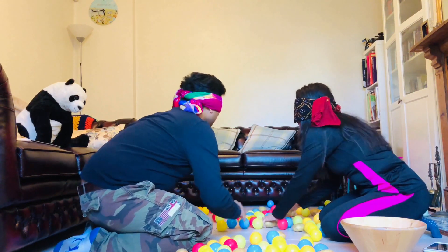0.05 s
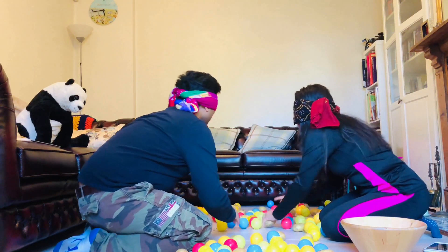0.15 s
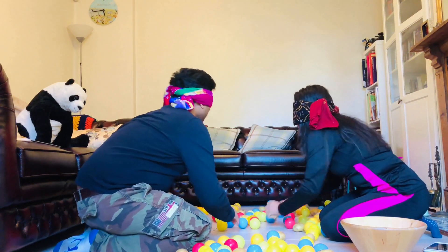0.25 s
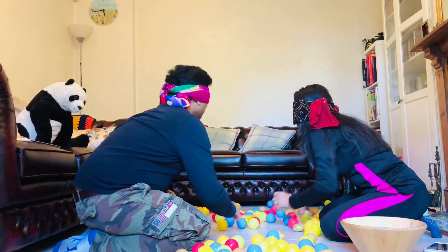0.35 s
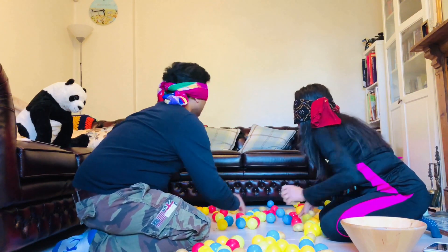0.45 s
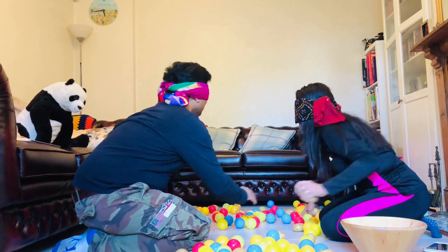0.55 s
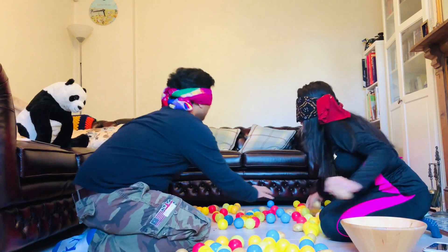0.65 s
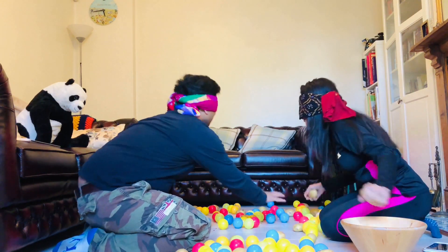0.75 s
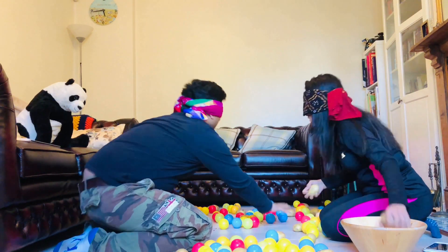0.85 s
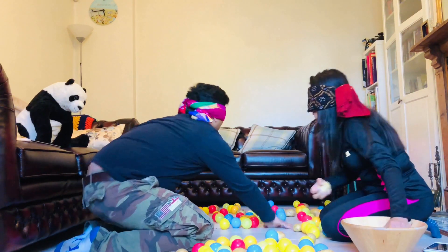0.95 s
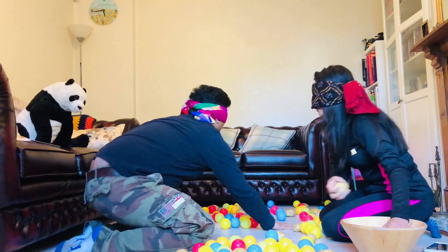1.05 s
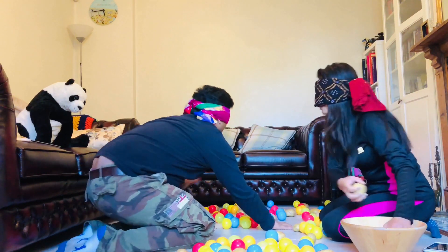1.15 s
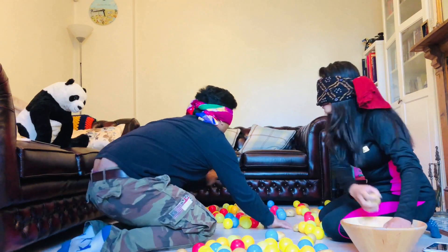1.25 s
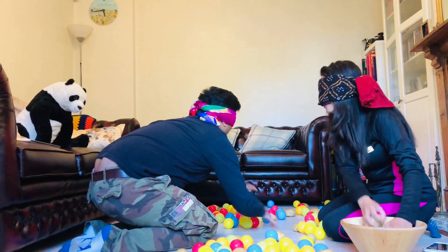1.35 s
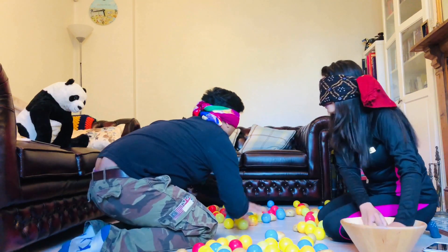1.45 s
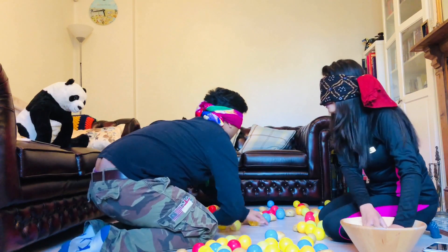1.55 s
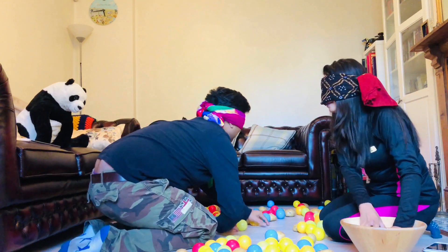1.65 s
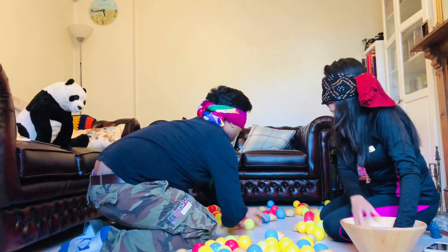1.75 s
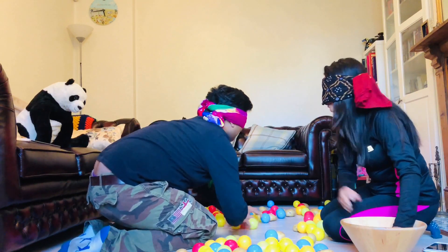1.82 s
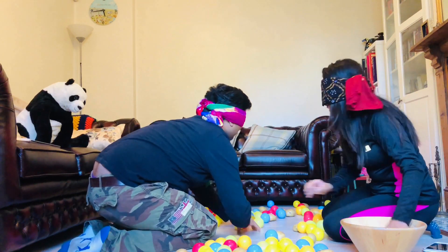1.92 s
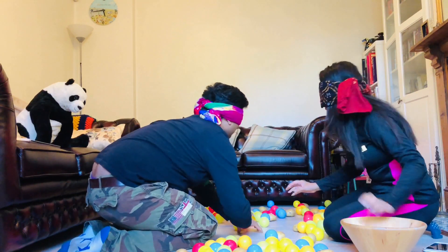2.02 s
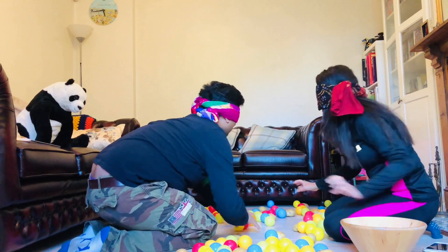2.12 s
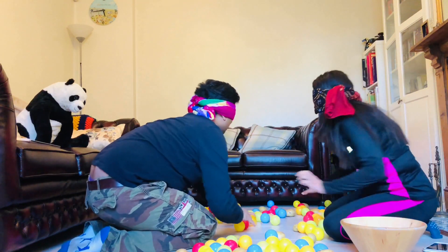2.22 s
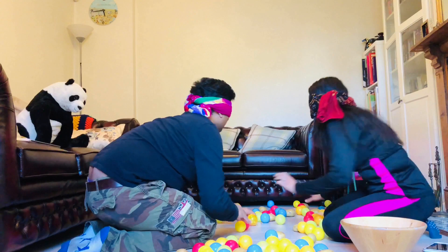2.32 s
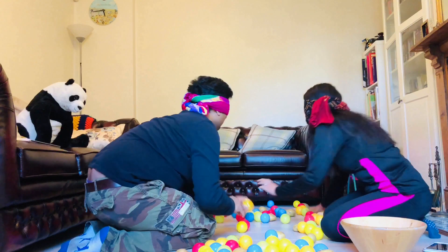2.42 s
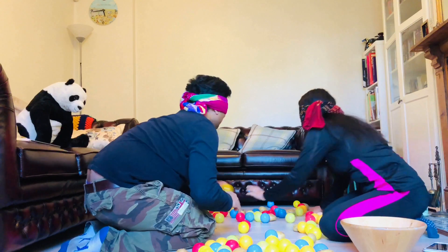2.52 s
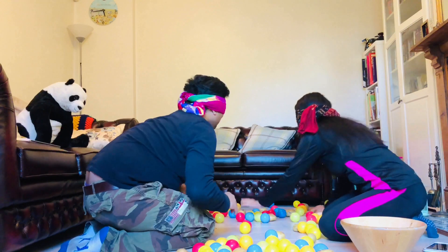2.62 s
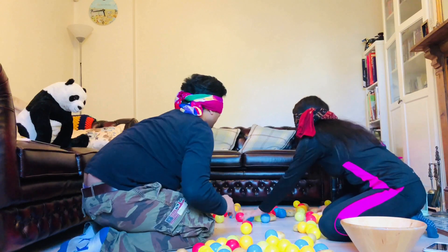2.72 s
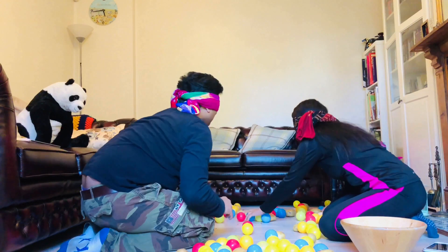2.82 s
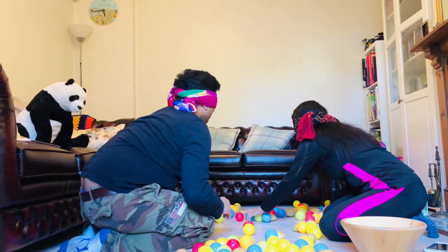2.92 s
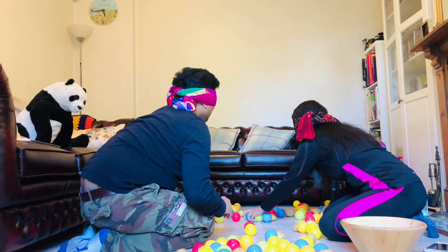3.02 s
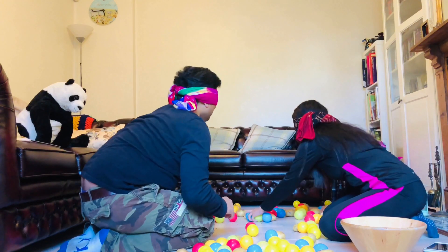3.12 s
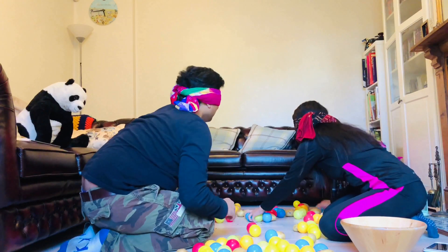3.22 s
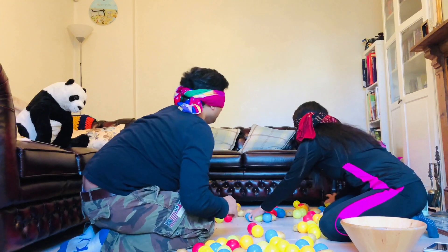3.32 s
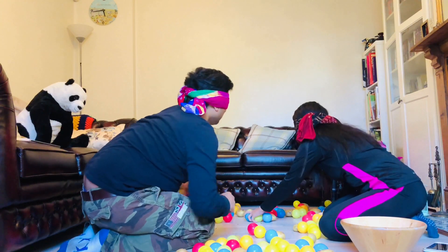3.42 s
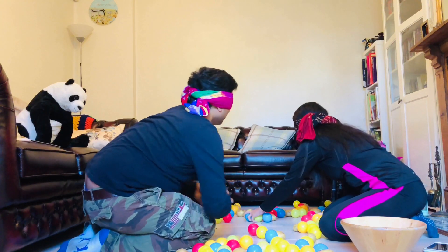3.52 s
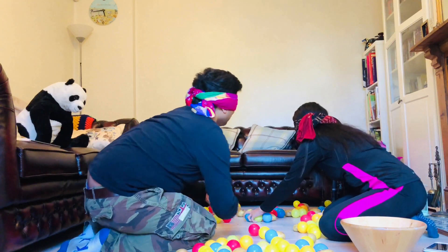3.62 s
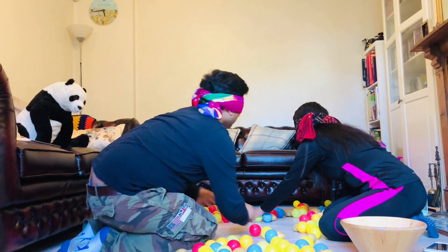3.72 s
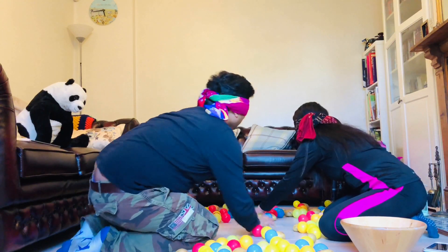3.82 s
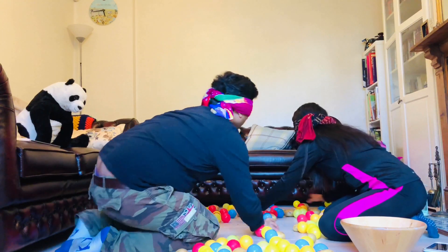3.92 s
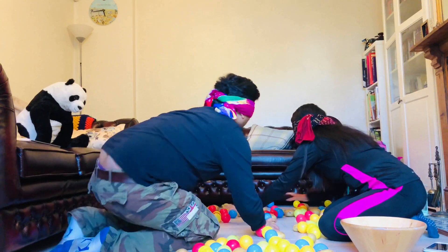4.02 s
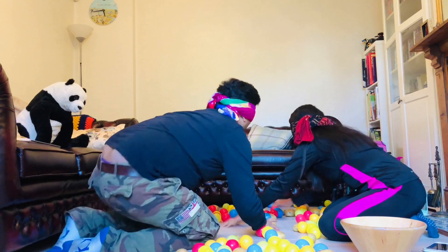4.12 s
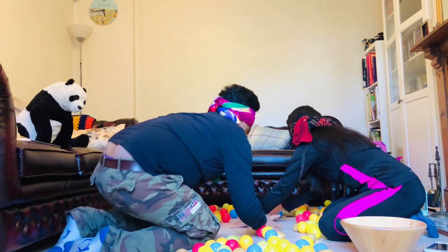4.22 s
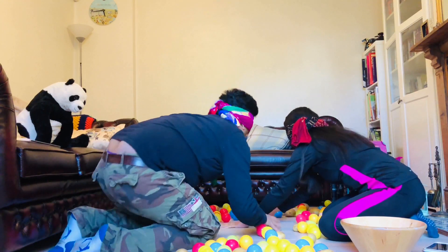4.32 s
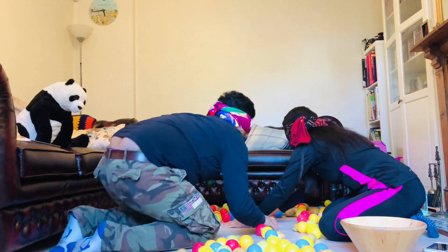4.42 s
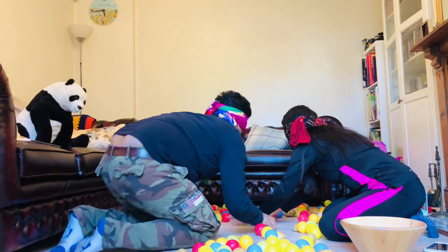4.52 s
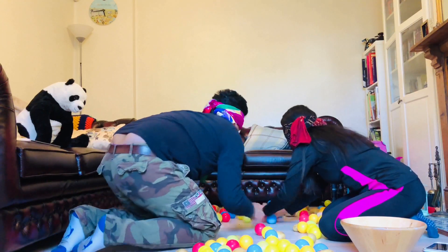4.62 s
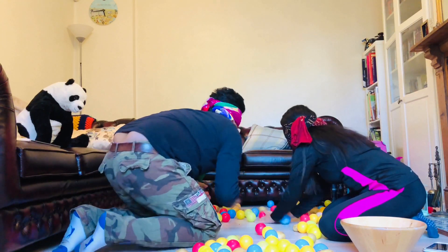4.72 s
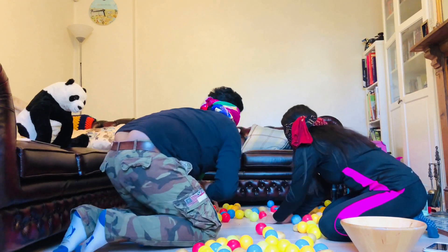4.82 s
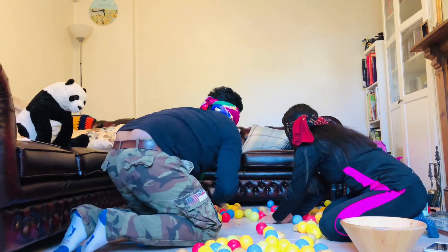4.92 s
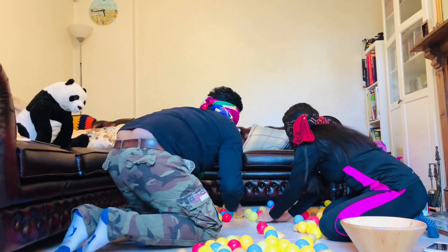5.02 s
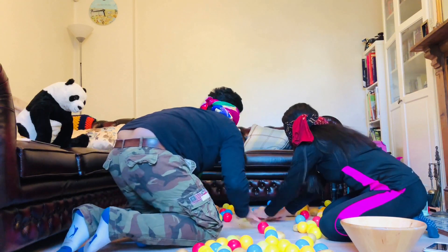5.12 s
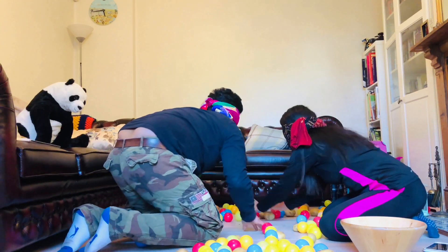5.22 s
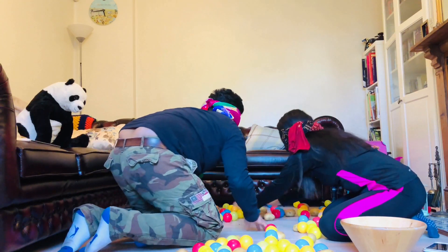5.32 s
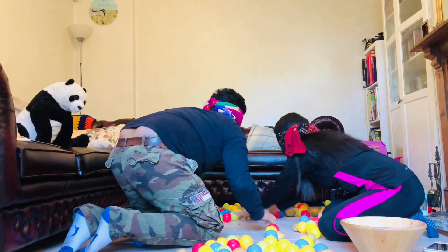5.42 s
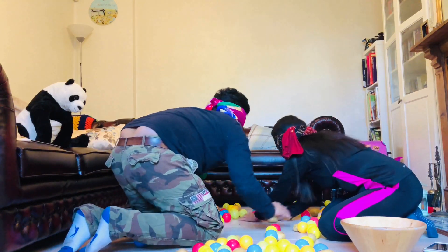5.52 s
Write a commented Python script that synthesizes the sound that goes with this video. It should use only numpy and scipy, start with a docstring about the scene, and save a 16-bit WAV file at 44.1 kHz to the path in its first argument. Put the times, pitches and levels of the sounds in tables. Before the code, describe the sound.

Two people rummage through light plastic balls indoors: small clacks, cloth swishes, two hollow bowl knocks, then a heavy floor thump.

```python
"""Hollow plastic balls, rummaged through by two people kneeling on a cloth-covered living-room floor.
Balls tap as short shell pops with a crack, roll and jostle as random contacts; two knock hard into
a bowl as downward chirps with ringing modes. Arm strokes over the cloth are shaped noise grains, a slap
and scuffs are noise bursts, hands and knees thud with floor modes; blows get a decaying-noise room tail."""
import sys
import numpy as np
from scipy import signal
from scipy.fft import rfft, irfft
from scipy.io import wavfile

SR = 44100
rng = np.random.default_rng(int(sys.argv[2]) if len(sys.argv) > 2 else 0)


def file_out(sig):
    """Save sig as 16-bit WAV at sys.argv[1]."""
    # one column per channel
    cols = np.atleast_2d(sig).T
    # limit, then scale
    lim = np.clip(cols, -1, 1)
    pcm = np.round(lim * 32767).astype(np.int16)
    wavfile.write(sys.argv[1], SR, pcm)


N = 245195
TAIL = 32768   # samples in each blow or response
TAIL_S = np.arange(TAIL) / SR


def from_db(db):
    """Decibels to amplitude gain."""
    return 10 ** (np.asarray(db) / 20)


def rms_one(x):
    """Scale to rms 1."""
    return x / np.sqrt(np.mean(x ** 2) + 1e-20)


def peak_one(x):
    """Scale to peak 1."""
    return x / np.abs(x).max()


def at_hz(points, hz):
    """Interpolate a table on a log-frequency axis."""
    f, value = np.transpose(points)
    return np.interp(np.log(np.maximum(hz, 1)), np.log(f), value)


def butter(x, hz, kind, order=2):
    """Butterworth filter."""
    sos = signal.butter(order, np.clip(hz, 10, .45 * SR), kind, fs=SR, output="sos")
    return signal.sosfilt(sos, x + 1e-18)


def pulse(spectrum):
    """Minimum-phase pulse with this magnitude spectrum, by folding the cepstrum."""
    level_db = at_hz(spectrum, np.fft.rfftfreq(TAIL, 1 / SR))
    cepstrum = irfft(np.log(from_db(level_db)))
    cepstrum[1:TAIL // 2] *= 2
    cepstrum[TAIL // 2 + 1:] = 0
    return irfft(np.exp(rfft(cepstrum)))


def through(x, response):
    """Convolve, keeping the length."""
    return signal.fftconvolve(x, response)[:len(x)]


def ring(hz, t60_s):
    """Struck mode: a sine that falls 60 dB in t60_s."""
    return np.sin(2 * np.pi * hz * TAIL_S) * np.exp(-np.log(1000) * TAIL_S / t60_s)


def add(track, s, sound):
    """Mix a sound in at time s."""
    start = max(round(s * SR), 0)
    track[start:start + len(sound)] += sound[:max(N - start, 0)]


def reflections(first_s=0.00091, build_s=0.0012):
    """Dense room echoes for one spot: coloured noise, each band with its own decay; unit energy."""
    # room decay: hz, t60_s
    room_t60 = [(80, .5), (250, 0.3254), (600, 0.4), (2000, 0.527), (5000, 0.4045), (14000, 0.45)]
    # room tail spectrum: hz, level_db
    room_colour = [(80, 8.5), (102, 3), (124, 0.5), (180, -5), (203, 0.5), (244, 5), (280, -1), (325, -1.5),
                   (380, 1), (455, 6), (700, -7.5), (870, -3.5), (1500, -0.5), (5000, -0.5)]
    hz = np.fft.rfftfreq(TAIL, 1 / SR)
    noise = rfft(rng.standard_normal(TAIL))
    coloured = noise / np.abs(noise) * from_db(at_hz(room_colour, hz))
    centres_hz = [f for f, t60_s in room_t60]
    out = 0
    # overlapping bands whose weights sum to 1
    for share, (f, t60_s) in zip(np.eye(len(centres_hz)), room_t60):
        weight = at_hz(list(zip(centres_hz, share)), hz)
        out = out + irfft(coloured * weight) * np.exp(-np.log(1000) * TAIL_S / t60_s)
    out = out * np.clip((TAIL_S - first_s) / build_s, 0, 1)
    return out / np.linalg.norm(out)


def in_room(sound, room_db):
    """Direct sound plus a tail whose energy lies room_db above it."""
    tail = through(sound, reflections())
    return sound + from_db(room_db) * tail * np.linalg.norm(sound) / np.linalg.norm(tail)


def grains(colour, per_s, spread_db, wash_db):
    """Random small contacts of uneven strength over a smooth noise wash, both coloured; rms 1."""
    sizes = from_db(spread_db * np.minimum(rng.exponential(1, N), 4)) * rng.choice([-1, 1], N)
    clicks = rms_one(sizes * (rng.random(N) < per_s / SR))
    wash = from_db(wash_db) * rng.standard_normal(N)
    return rms_one(through(clicks + wash, pulse(colour)))


def moves(starts_s, rises_s, lengths_s, levels_db, fade_db_per_s, idle_db):
    """Gain of a run of moves: each swells, holds to its length, then fades; powers add to faint idling."""
    # restlessness, offset on the idle level only: time_s, offset_db
    bustle = [(0, 2.5), (1.3, 2), (1.9, 1), (2.27, -5), (2.7, 1), (3.0, 3.5), (3.25, -7.5), (3.75, 0),
              (4.3, 6.5), (4.9, 0.5), (5.56, 2.5)]
    t = np.arange(N) / SR
    power = from_db(idle_db + np.interp(t, *np.transpose(bustle))) ** 2
    for s, rise_s, length_s, db in np.broadcast(starts_s, rises_s, lengths_s, levels_db):
        swell = np.clip((t - s) / rise_s, 0, 1)
        fade_db = fade_db_per_s * np.clip(t - s - length_s, 0, 1)
        power = power + (swell * from_db(db - fade_db)) ** 2
    return np.sqrt(power)


def room_air(level_db=-76):
    """Still room: steady noise with a fixed spectrum."""
    # still-room spectrum: hz, level_db (per Hz)
    air_colour = [(20, 4), (35, 1.5), (100, -21), (400, 8), (2000, -15), (16000, -41)]
    return from_db(level_db) * rms_one(through(rng.standard_normal(N), pulse(air_colour)))


def strokes(hiss_fade_db_per_s=167.5, swish_fade_db_per_s=126.5, idle_hiss_db=-67, idle_swish_db=-66):
    """As an arm sweeps, the palm hisses over the cloth and the sleeve swishes: dense slip grains."""
    # arm strokes: start_s, rise_s, length_s, palm_hiss_db, sleeve_swish_db
    arm_strokes = [(0, 0.0017, 0.018, -67, -54.5), (0.052, 0.012, 0.13, -53.5, -58),
                   (.22, .01, 0.034, -58, -65), (0.333, 0.024, .04, -59, -64),
                   (0.438, 0.081, 0.19, -65, -53), (0.861, 0.025, 0.1, -64, -68),
                   (0.987, 0.12, 0.2, -54, -46), (1.26, .02, 0.027, -60.5, -73),
                   (1.368, 0.033, 0.11, -55, -50.5), (1.533, .01, 0.037, -54, -56),
                   (1.61, 0.034, 0.1, -54.5, -53.5), (1.768, 0.028, 0.14, -63.5, -58),
                   (2.042, 0.018, 0.098, -75, -57), (2.377, 0.056, 0.12, -61, -61),
                   (2.502, .02, .04, -62, -58.5), (2.642, 0.033, 0.13, -64, -57),
                   (2.813, 0.048, 0.07, -54, -55), (2.887, 0.13, 0.17, -47.5, -47),
                   (3.284, 0.016, 0.024, -59.5, -62.5), (3.403, 0.032, 0.046, -46.5, -51),
                   (3.479, 0.035, 0.11, -47.5, -47), (3.725, .03, 0.067, -62, -60),
                   (3.956, 0.0097, 0.056, -49, -56), (4.023, .03, 0.12, -54, -52),
                   (4.15, 0.034, 0.12, -54.5, -53.5), (4.365, 0.046, 0.065, -55, -51),
                   (4.589, .015, 0.03, -63, -54), (4.641, .03, 0.065, -50, -50.5),
                   (4.73, 0.016, 0.093, -61, -55.5), (4.9, 0.032, 0.1, -56, -58.5),
                   (5.006, .015, 0.023, -66, -52.5), (5.174, 0.024, 0.044, -58.5, -63),
                   (5.272, .03, 0.11, -75, -55.5), (5.359, 0.017, 0.13, -50, -48.5)]
    # sleeve spectrum: hz, level_db (per Hz)
    swish_colour = [(700, -43.5), (1500, 1.5), (2100, 0), (3000, 0.5), (3700, 2.5), (5000, -4), (6500, -12),
                    (12000, -23)]
    # palm spectrum: hz, level_db (per Hz)
    hiss_colour = [(2000, -52), (4500, -1), (6500, 0.5), (9000, -3), (12000, -3.5), (15800, -0.5)]
    s, rise_s, length_s, hiss_db, swish_db = np.transpose(arm_strokes)
    hiss = moves(s, rise_s, length_s, hiss_db, hiss_fade_db_per_s, idle_hiss_db)
    swish = moves(s, rise_s, length_s, swish_db, swish_fade_db_per_s, idle_swish_db)
    return (swish * grains(swish_colour, per_s=1500, spread_db=4.0, wash_db=4.0)
            + hiss * grains(hiss_colour, per_s=5000, spread_db=8.5, wash_db=6))


def scuffs(room_db=0.0, grain_db=3.5):
    """A hand hits and skids over the cloth: a short burst of tiny slips of uneven strength."""
    # slaps and scuffs: start_s, level_db, length_s
    skids = [(0.517, -25, 0.025), (1.428, -48, 0.022), (3.434, -38, 0.018), (3.968, -47.5, 0.029),
             (5.083, -48, 0.02)]
    # skid spectrum: hz, level_db (per Hz)
    skid_colour = [(40, -17), (100, 2.5), (250, 10), (500, 6.5), (900, 7.5), (1500, -9), (2400, 2),
                   (4000, -13.5), (7000, -11), (16000, -8)]
    out = np.zeros(N)
    for s, db, length_s in skids:
        envelope = np.sqrt(np.maximum(np.sin(np.pi * np.minimum(TAIL_S / length_s, 1)), 0))
        slips = rng.standard_normal(TAIL) * from_db(grain_db * rng.standard_normal(TAIL))
        burst = envelope * rms_one(through(slips, pulse(skid_colour)))
        add(out, s, from_db(db) * in_room(burst, room_db))
    return out


def thuds(cycles=11, ring_db=-20, low_hz=95):
    """A soft push by hand or knee rings for a few cycles and wakes the floor's modes."""
    # hand and knee thuds: start_s, level_db, pitch_hz, contact_cutoff_hz, room_db
    pushes = [(.340, -32, 272, 424, 5.5), (0.886, -38.5, 240, 403, 12.5), (1.3898, -21.5, 240, 355, 1.5),
              (1.843, -41, 258, 816, 9.5), (3.072, -43, 157, 350, 5), (3.8229, -14, 286, 473, 1.5),
              (3.838, -19.5, 300, 477, -0.5), (4.597, -36.5, 290, 610, 3), (4.634, -40, 264, 560, 3.5),
              (5.406, -36, 360, 660, 3)]
    # floor modes: hz, level_db, t60_s
    floor_modes = [(105, 0, 0.15), (151, -35, .34), (186, -31.5, 0.17), (240, -5, 0.18), (290, -25, 0.35),
                   (350, -16, 0.34), (417, -1.5, 0.55), (487, 0, 0.27), (510.7, 10, 0.25), (636, 4.5, 0.27),
                   (657, -1.5, 0.4), (1060, -17, .3)]
    out = np.zeros(N)
    modes = sum(from_db(db) * ring(f, t60_s) for f, db, t60_s in floor_modes)
    for s, db, hz, contact_hz, room_db in pushes:
        push = butter(ring(hz, cycles / hz / 2), low_hz, "high")
        push = peak_one(butter(push, contact_hz, "low", order=3))
        boards = from_db(ring_db) * butter(modes, contact_hz, "low", order=3)
        add(out, s, from_db(db) * (in_room(push, room_db) + boards))
    return out


def knocks(travel_s=.0036, ring_db=-26):
    """Bending waves in the bowl wall run faster at high pitch: each knock chirps down, then modes ring."""
    # balls into the bowl: start_s, level_db, room_db
    bowl_hits = [(0.9412, -13.5, 0), (1.4549, -8, -2)]
    # hollow resonances, one spectrum per hit: hz, level_db
    hit_colours = [
        [(60, -40), (150, -30), (250, -3), (450, -7), (640, 3.5), (800, 1.5), (1000, -5.5), (1270, -13.5),
         (1720, -11), (2050, -14.5), (2650, -26), (3100, -26.5), (4700, -36), (8000, -63)],
        [(60, -35), (150, -24), (250, 0.5), (420, -4), (600, 5), (850, 1.5), (1100, -4), (1380, -7.5),
         (2100, -10.5), (2700, -15.5), (3200, -14.5), (4100, -27.5), (5500, -33.5), (9000, -67)],
    ]
    # bowl modes: hz, level_db, t60_s
    bowl_modes = [(254, 0.5, 0.45), (265, -20, 1), (452, -47, 0.38), (514, -28, 0.5), (609, 2.5, 0.23),
                  (730, -5, 0.15), (785, -65.5, .23), (815, -29, 0.57), (927, 5.5, 0.33), (1118, 3.5, 0.2),
                  (1319, -32, 0.26), (1608, 6.5, 0.1), (1710, -18, .3), (1750, -11, 0.17), (2060, -29, .35),
                  (2485, -5, .24)]
    out = np.zeros(N)
    hz = np.fft.rfftfreq(TAIL, 1 / SR)
    # group delay is travel_s at 1 kHz and goes as 1/sqrt(hz)
    dispersion = np.exp(-4j * np.pi * travel_s * np.sqrt(1000 * hz))
    modes = sum(from_db(db) * ring(f, t60_s) for f, db, t60_s in bowl_modes)
    for (s, db, room_db), colour in zip(bowl_hits, hit_colours):
        chirp = peak_one(irfft(rfft(pulse(colour)) * dispersion))
        add(out, s, from_db(db) * in_room(chirp, room_db))
        add(out, s + travel_s, from_db(db + ring_db) * modes)
    return out


def shell(hz, t60_s):
    """A hollow ball's short pop; its overtones die sooner."""
    # shell modes: pitch_ratio, level_db
    shell_modes = [(1, 12), (1.27, 1), (1.62, -9), (2.15, -13.5)]
    return sum(from_db(db) * ring(hz * ratio, t60_s / np.sqrt(ratio)) for ratio, db in shell_modes)


def jostle(per_s=170, spread_db=3.5, cycles=9.8, room_db=3.5, count=10):
    """Loose balls touch at random, each with a pitch of its own; rms 1."""
    sizes = from_db(spread_db * np.minimum(rng.exponential(1, N), 3)) * rng.choice([-1, 1], N)
    clicks = sizes * (rng.random(N) < per_s / SR)
    ball = rng.integers(0, count, N)
    pops = np.zeros(N)
    for k, hz in enumerate(np.geomspace(430, 1500, count)):
        pops += through(clicks * (ball == k), in_room(shell(hz, cycles / hz), room_db))
    return rms_one(butter(butter(pops, hz=300, kind="high"), hz=2560, kind="low"))


def rolling_and_shuffling(jostle_db=-5.0, roll_db=-4.0, rise_s=0.018, settle_db_per_s=132.5,
                          idle_rolling_db=-60, idle_shuffle_db=-65):
    """Balls, shoved by a shuffling body or jarred by a bowl knock, roll, jostle and settle."""
    # shoves, and balls jarred by the bowl knock at 1.46 s: start_s, length_s, rolling_db, shuffle_db
    stirrings = [(0, 0.036, -53.5, -74), (.055, 0.1, -51, -56.5), (0.185, 0.15, -57, -78),
                 (0.435, 0.049, -59, -69), (0.707, 0.03, -77, -58.5), (0.97, 0.029, -52, -47),
                 (1.143, .06, -61, -68), (1.267, 0.023, -62, -65), (1.46, 0.019, -50, -64),
                 (1.656, .11, -62, -56.5), (1.875, 0.021, -59, -54), (2.076, 0.07, -65.5, -68),
                 (2.375, .08, -64, -58.5), (2.507, .03, -56, -53), (2.62, 0.17, -62.5, -64),
                 (2.804, 0.07, -54, -52), (2.994, 0.081, -54, -59), (3.284, 0.024, -59, -60.5),
                 (3.416, 0.049, -45, -58), (3.549, 0.056, -52.5, -57), (3.725, 0.12, -55.5, -60.5),
                 (4.031, 0.087, -38.5, -52), (4.165, 0.063, -50, -51.5), (4.357, 0.085, -58.5, -66),
                 (4.555, 0.071, -53, -59), (4.674, 0.063, -49, -54), (5.003, 0.022, -51.5, -50.5),
                 (5.088, 0.028, -50.5, -48.5), (5.273, 0.12, -56.5, -61), (5.333, .04, -50.5, -49),
                 (5.37, 0.073, -40.5, -44)]
    # rolling-ball spectrum: hz, level_db (per Hz)
    rolling_colour = [(150, -39), (300, -7), (380, 1), (470, 6), (620, 1.5), (900, -0.5), (1500, -8.5),
                      (2000, -8), (3000, -21), (7000, -46)]
    # body-shuffle spectrum: hz, level_db (per Hz)
    shuffle_colour = [(25, -24), (55, -14.5), (80, -4), (104, 1), (135, 1), (200, -0.5), (270, 4.5),
                      (340, -2.5), (500, -5), (1200, -87)]
    s, length_s, rolling_db, shuffle_db = np.transpose(stirrings)
    rolling = moves(s, rise_s, length_s, rolling_db, settle_db_per_s, idle_rolling_db)
    shuffle = moves(s, rise_s, length_s, shuffle_db, settle_db_per_s, idle_shuffle_db)
    roll = grains(rolling_colour, per_s=500, spread_db=1.5, wash_db=1.0)
    balls = from_db(jostle_db) * jostle() + from_db(roll_db) * roll
    return rolling * balls + shuffle * grains(shuffle_colour, per_s=400, spread_db=2.5, wash_db=3.5)


def taps(cycles=10.0, least_s=0.0016, crack_s=0.0042, crack_hz=4500):
    """Noise crack plus thin-shell pop: ball contacts, and the hard edge of a thud near 3.82 s."""
    # ball contacts, and the hard edge of a knee or hand thud near 3.82 s:
    # start_s, level_db, pop_pitch_hz, crack_db, room_db
    hard_taps = [(0.332, -37.5, 2240, -6, 7.5), (0.5216, -11, 640, -12.5, 2.5), (0.5287, -25, 536, -32, 11),
                 (.541, -24.5, 1520, -1.5, 9), (0.88, -43, 1120, -14, 9), (2.0256, -30, 3080, -12, 2),
                 (2.518, -34, 890, -26, 4), (2.592, -42, 950, -20, 4.5), (2.811, -39.5, 1290, -8, 13.5),
                 (2.818, -37, 1380, -8, -3), (2.823, -37, 2430, -17, 7), (3.411, -43, 3940, -11.5, 12),
                 (3.430, -32, 493, 3, 8), (3.433, -29, 1470, -19, 9.5), (3.440, -26, 1300, -9, -5),
                 (3.820, -38, 2840, -10, 3), (3.8204, -34.5, 905, -10.5, 6), (3.826, -23.5, 465, -38, 8),
                 (4.037, -29.5, 790, -10.5, 3), (4.056, -27.5, 1650, -7, 0), (4.065, -28.5, 1700, -15, 0),
                 (4.1039, -29, 3370, -25, 3), (4.106, -31.5, 790, -4.5, 3.5), (4.787, -31, 1530, -17, -0.5),
                 (5.017, -46, 1970, -2, -5), (5.092, -36, 685, -4.5, 7.5), (5.258, -41, 1520, -9, 4.5),
                 (5.347, -40, 1220, -1, 0), (5.384, -33.5, 890, -6, 6), (5.483, -31, 1100, -5.5, 7),
                 (5.499, -35, 1200, -16, 1)]
    out = np.zeros(N)
    for s, db, hz, crack_db, room_db in hard_taps:
        crack = butter(rng.standard_normal(TAIL), crack_hz, "low", order=1) * np.exp(-TAIL_S / crack_s)
        pop = peak_one(shell(hz, least_s + cycles / hz))
        tap = peak_one(butter(pop + from_db(crack_db) * crack, hz / 2, "high"))
        add(out, s, from_db(db) * in_room(tap, room_db))
    return out


def scene():
    """All sources at one microphone; the blows radiate no deep bass."""
    blows = scuffs() + thuds() + knocks() + taps()
    blows = butter(blows, hz=93.0, kind="high", order=4)
    return (room_air() + strokes() + rolling_and_shuffling() + blows)[None]


def record(dry, cutoff_hz=15900):
    """Steep elliptic low-pass cuts the top."""
    return signal.sosfilt(signal.ellip(10, .1, 75, cutoff_hz, fs=SR, output="sos"), dry)


dry = scene()
out = record(dry)
file_out(out)
```